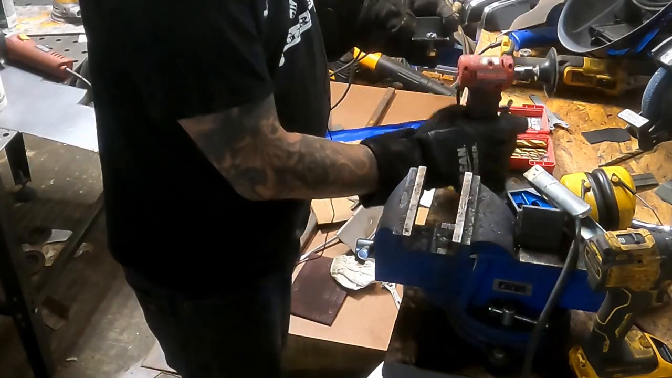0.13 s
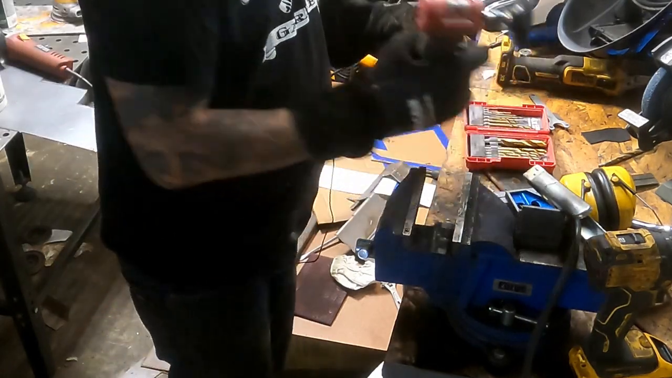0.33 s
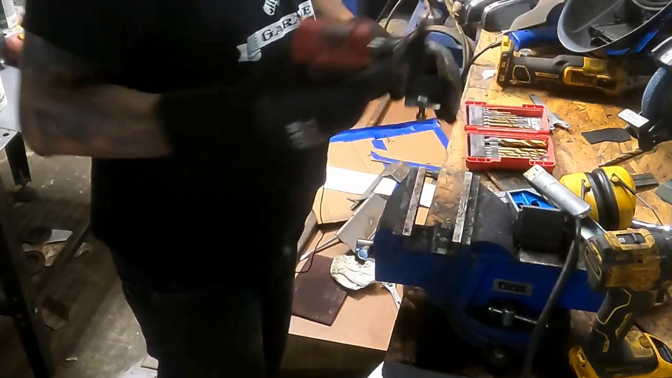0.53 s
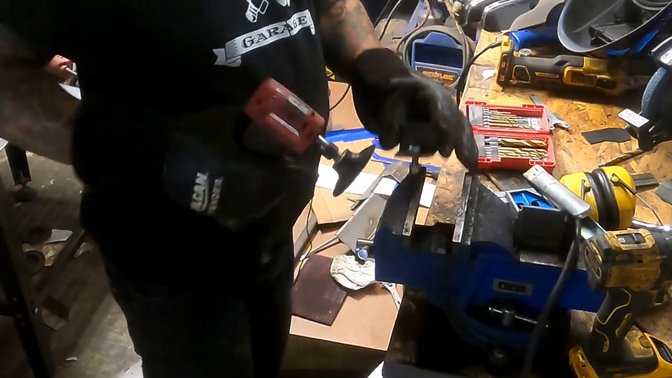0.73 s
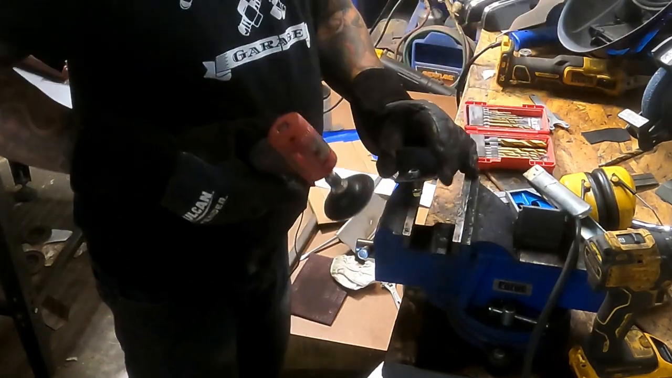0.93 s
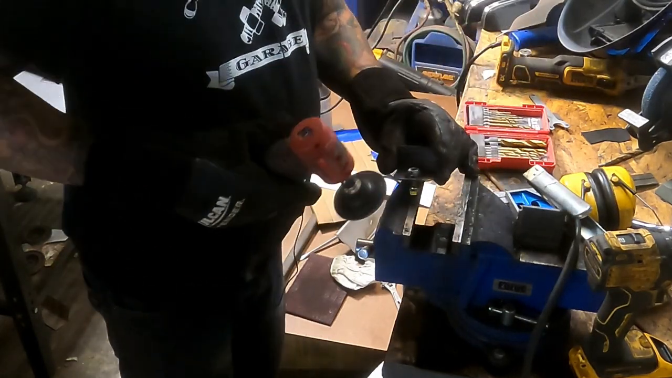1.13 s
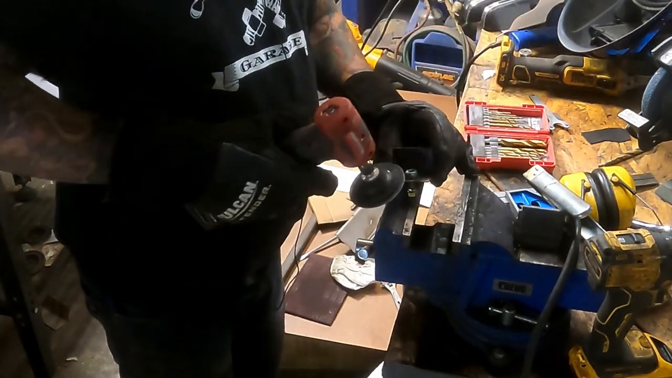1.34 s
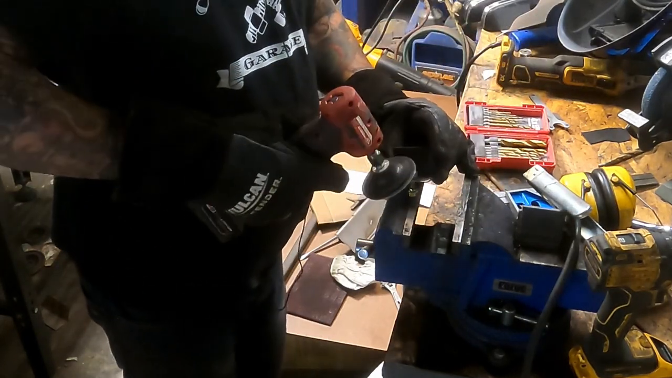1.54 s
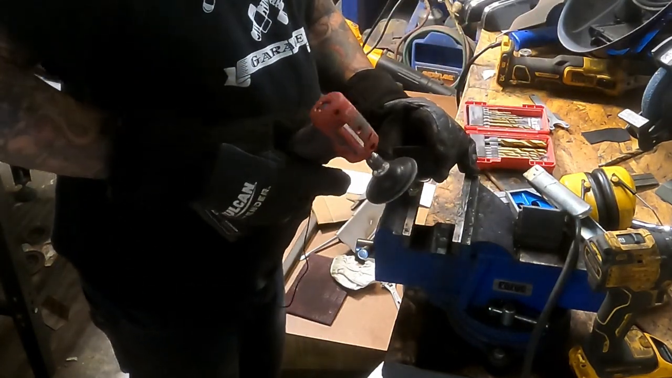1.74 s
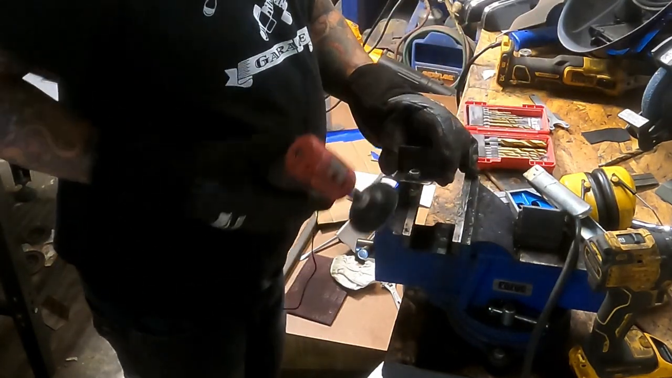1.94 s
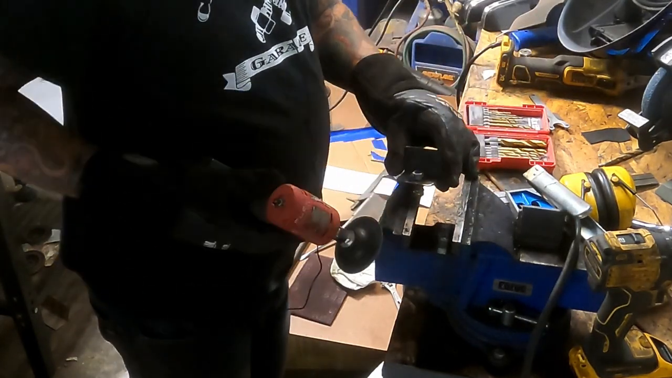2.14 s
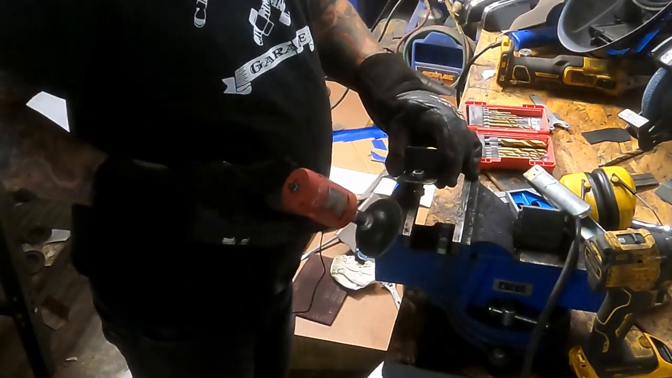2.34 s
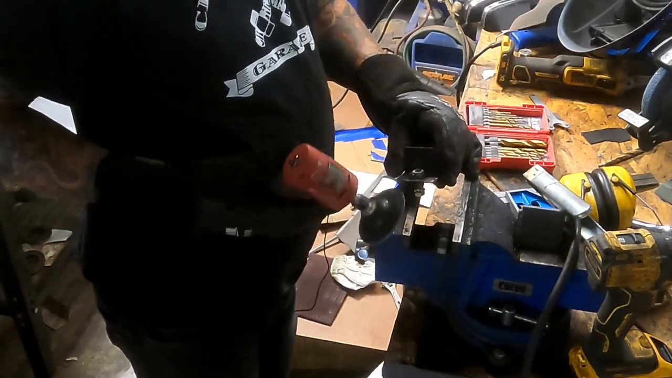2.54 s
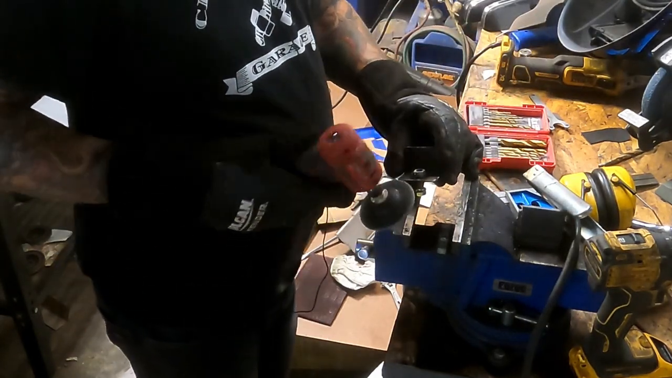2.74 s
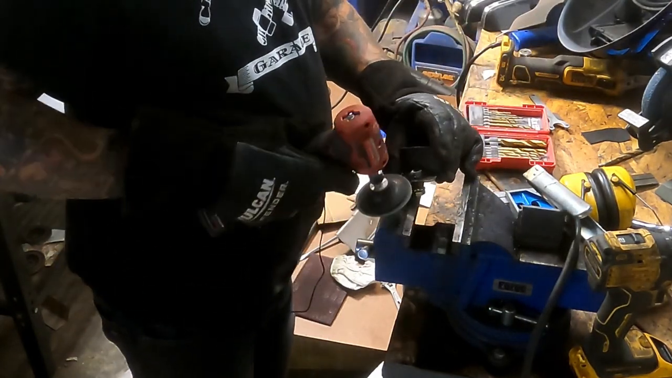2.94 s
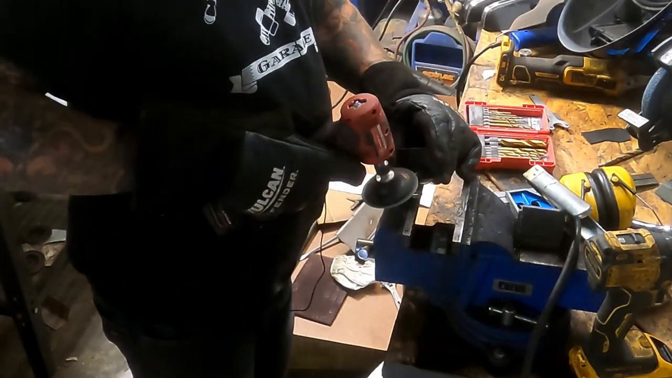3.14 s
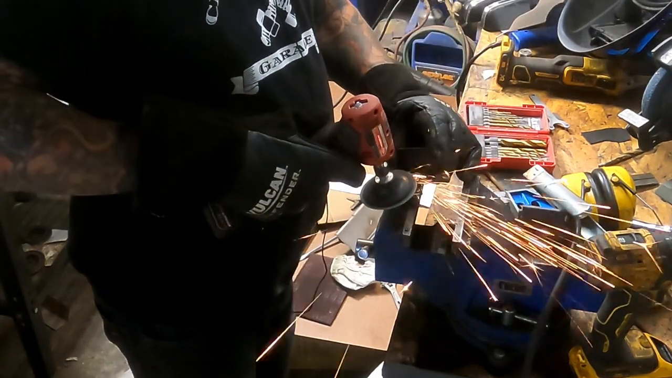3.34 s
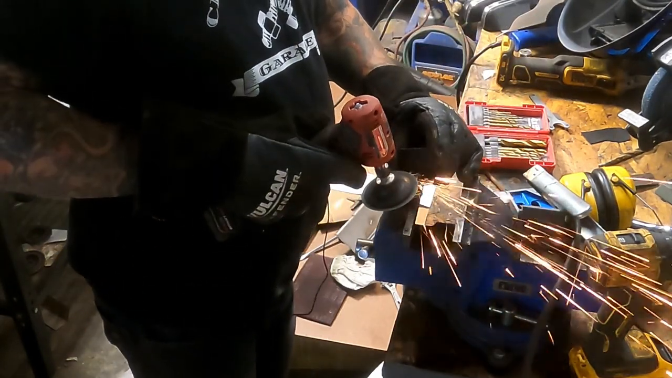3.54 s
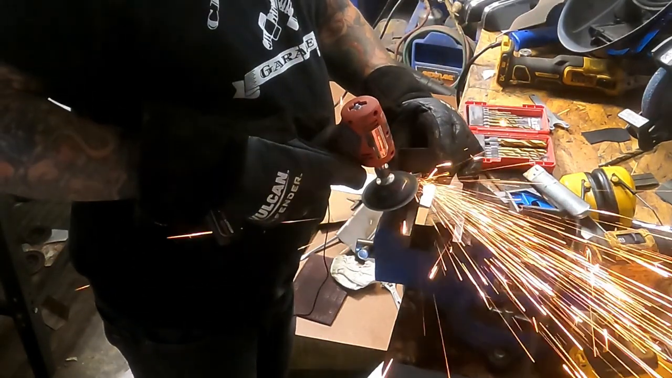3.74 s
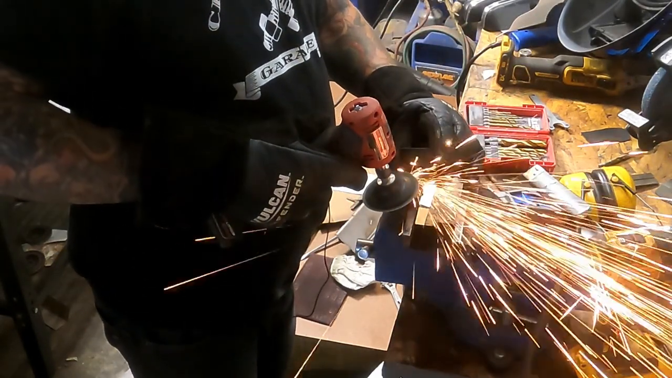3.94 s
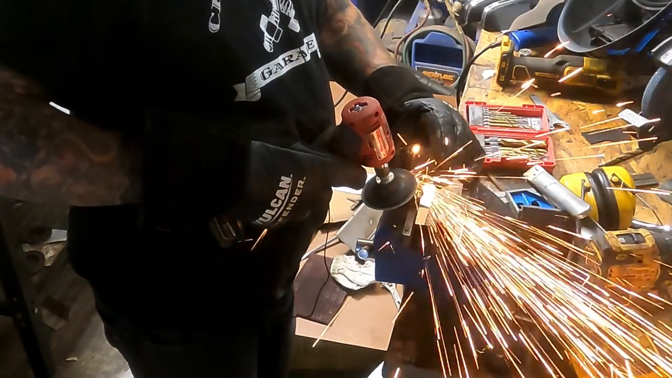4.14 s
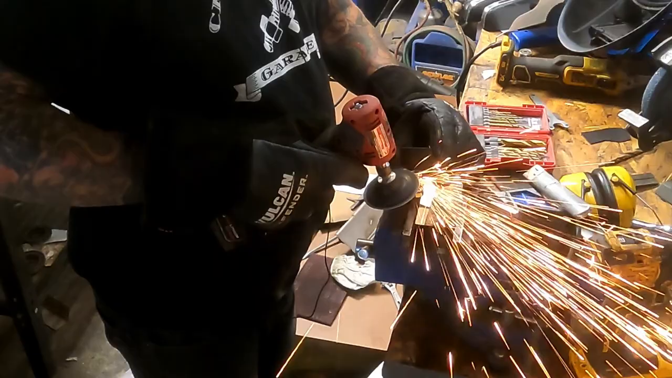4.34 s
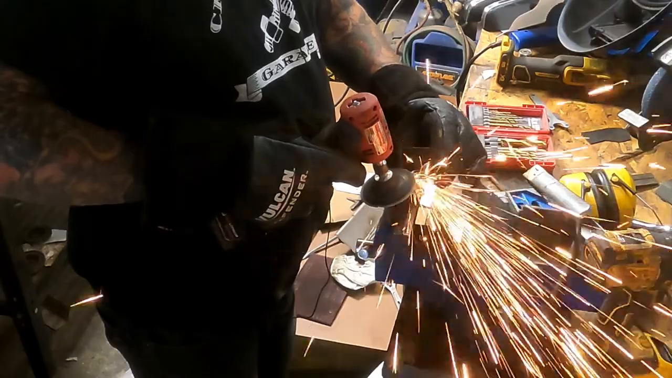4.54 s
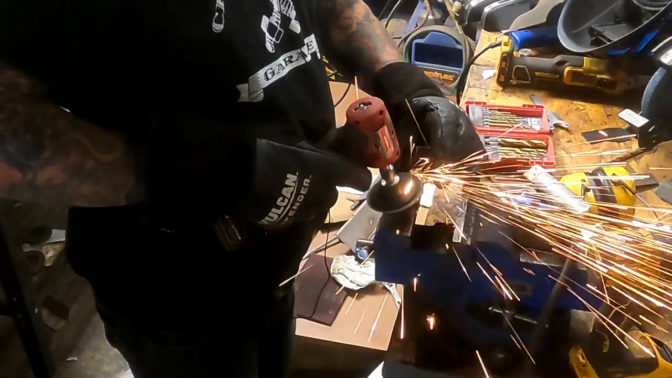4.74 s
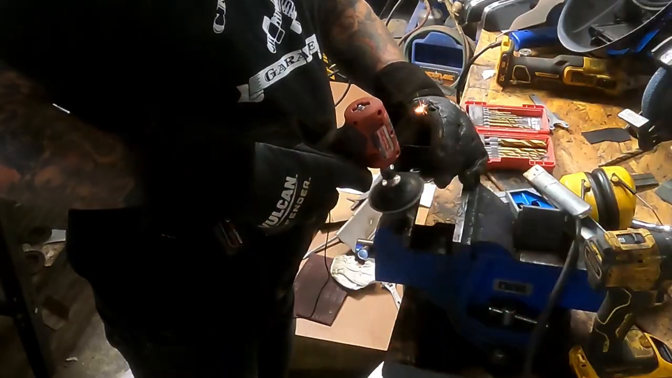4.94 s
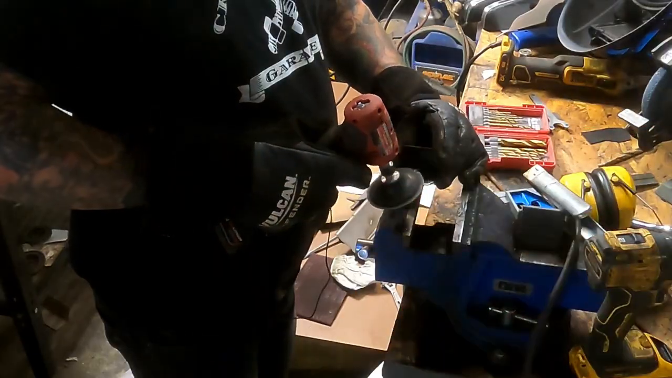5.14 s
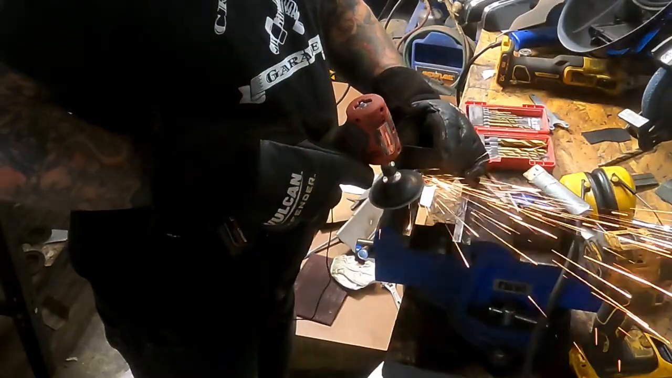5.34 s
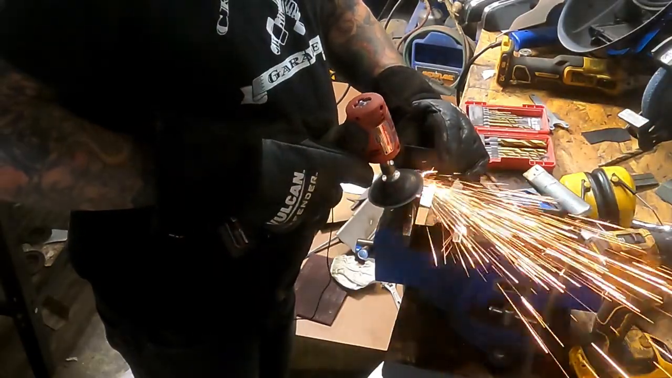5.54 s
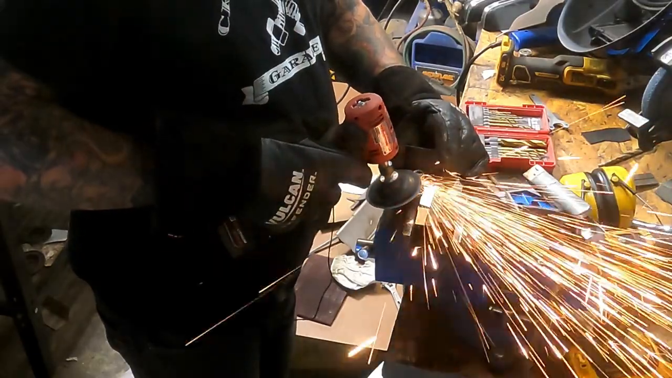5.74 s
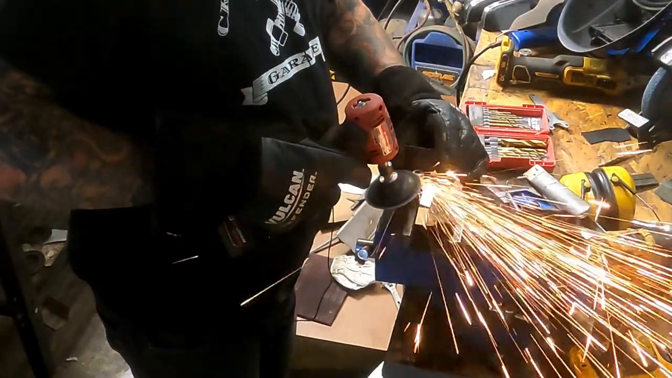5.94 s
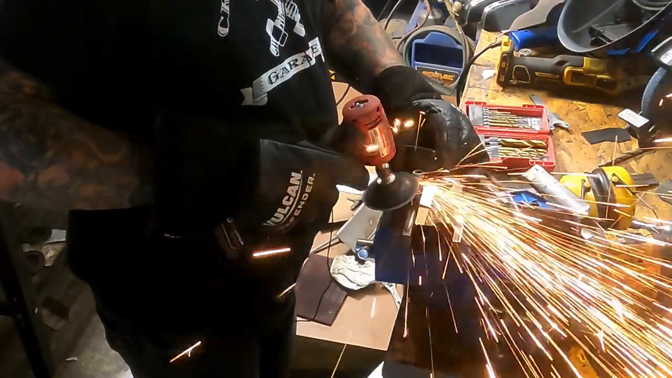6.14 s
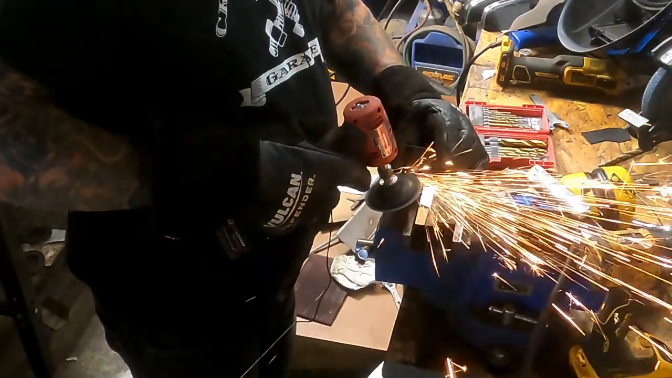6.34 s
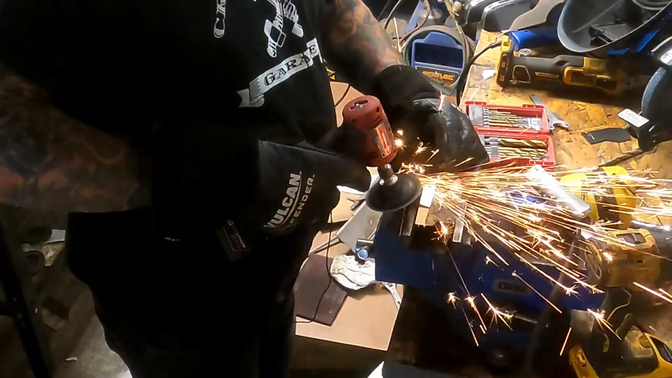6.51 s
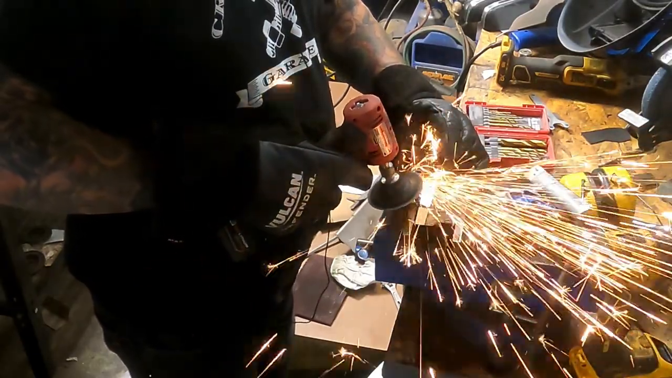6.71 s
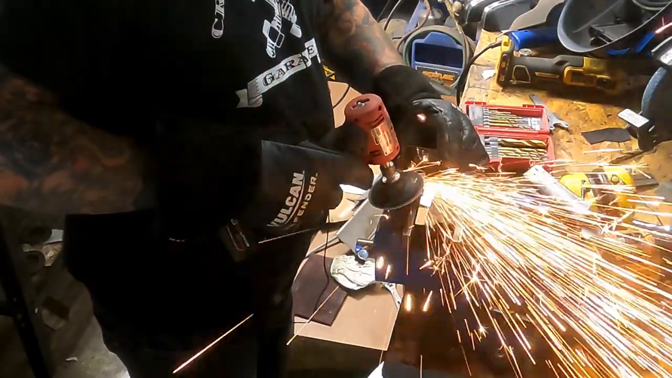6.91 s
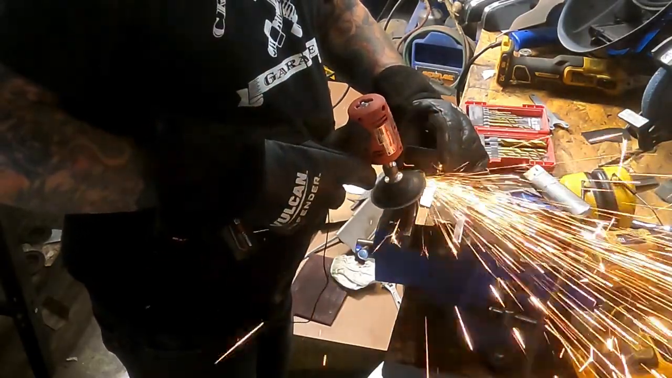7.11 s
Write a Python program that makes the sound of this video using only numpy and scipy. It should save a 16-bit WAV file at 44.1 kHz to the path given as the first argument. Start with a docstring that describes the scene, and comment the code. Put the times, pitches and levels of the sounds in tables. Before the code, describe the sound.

After light handling clicks, a small cordless grinder spins up and rasps against steel, pausing briefly between two bright passes.

```python
"""At a workbench in a quiet shop, a cordless die grinder is handled, switched on and pressed on steel
held in a vice. The disc's grit passes the steel once a turn, a nearly periodic force that excites its
resonances. The motor's switching tone, modulated by the turning field, splits into sidebands as the
shaft speeds up; fan, gears and bearings sound with it. Gloves rustle, small clicks mark the handling,
air gusts rumble on the microphone and the shop hums behind."""
import sys
import numpy as np
from scipy import signal
from scipy.fft import rfft, irfft
from scipy.io import wavfile
from scipy.ndimage import uniform_filter1d, map_coordinates

SR = 44100
rng = np.random.default_rng(int(sys.argv[2]) if len(sys.argv) > 2 else 0)


def generate_wav(signal):
    """Clip the signal to [-1, 1] and save it as 16-bit WAV at the path in sys.argv[1]."""
    frames = np.transpose(np.atleast_2d(signal))
    scaled = np.clip(frames, -1, 1) * 32767
    pcm = np.round(scaled).astype(np.int16)
    wavfile.write(sys.argv[1], SR, pcm)


N = 320607
TIME = np.arange(N) / SR
SWITCH_ON_S, FREE_SPEED_HZ = 2.715, 166.5

# low ring, hiss and top bands: (low edge [Hz], high edge [Hz])
BANDS = [(1400, 4100), (3900, 10000), (9700, 16000)]
# loudness of the grinding's low ring, hiss and top bands: (gain [dB])
BAND_GAINS = [1.0, -.6, -1.0]
# thin high ring of the disc: (time [s], level re hiss [dB])
DISC_SIZZLE = [(3.2, -13), (3.6, -13), (4.1, -18), (4.5, -32), (4.9, -22), (5.3, -34)]
def grinding(turns, shaft_hz):
    """Source-filter model: grit drives the steel, and the hand's contact sets the level of each band."""
    hiss_db, ring_db, top_db, repeat = contact(shaft_hz)
    steel = steel_response(grit_force(turns, repeat) * bounce(turns, repeat, hiss_db))
    ring, hiss, top = (undb(db) * even_out(band(band(steel, lo, hi), lo, hi))
                       for (lo, hi), db in zip(BANDS, BAND_GAINS))
    sizzle = even_out(band(steel, 14350, 14850)) * undb(curves(DISC_SIZZLE)[0])
    bright = undb(hiss_db) * (hiss + sizzle) + undb(ring_db) * ring + undb(top_db) * top
    return bright + growl(turns, shaft_hz, steel, hiss_db)


def grit_force(turns, repeat, wear_turns=7.44, rim_points=256):
    """Quasi-periodic excitation: the wearing rim returns each turn, while loose grit adds hiss."""
    loose = level(signal.lfilter(*signal.butter(1, 3300, "high", fs=SR), noise()), -3.5)
    roughness = rng.standard_normal((1000, rim_points))  # one row a turn
    for _ in range(2):
        roughness = signal.lfilter([1], [1, -np.exp(-1 / wear_turns)], roughness, axis=0)
    rim = level(map_coordinates(roughness[200:].ravel(), [turns * rim_points], order=3))
    return np.sqrt(repeat) * rim + np.sqrt(1 - repeat) * loose


def bounce(turns, repeat, hiss_db, skip_below_db=-23):
    """Amplitude modulation: the disc bounces on a high spot and a weaker opposite one, both drifting."""
    spots = np.cos(2 * np.pi * turns + 2.13 * walk(5))
    spots += .67 * np.cos(4 * np.pi * turns + 1.87 * walk(5))
    skipping = .1 * np.maximum(skip_below_db - hiss_db, 0) * (hiss_db > -60)  # under light contact
    depth = np.clip(.2 + .45 * (1 - repeat) + skipping, 0, 3)
    gain = np.exp(depth * spots)
    return gain / np.sqrt(uniform_filter1d(gain ** 2, 800))


# broad response of the steel: (frequency [Hz], gain [dB])
STEEL_SPECTRUM = [(530, -63.5), (900, -15), (1290, -9.5), (1410, -25.5), (1620, -13), (1880, -13),
                  (2220, -11), (4050, -11.5), (4860, -2.5), (5550, -1), (7060, 5.5), (12000, -2),
                  (16000, -19.5)]
# its resonances: (frequency [Hz], width [Hz], added peak re broad response [dB])
STEEL_MODES = [(2262, 260, 0), (2593, 360, -4), (5020, 250, -4), (6920, 430, -6), (9250, 240, -6),
               (15660, 280, -13)]
def steel_response(force, shift_db=3.2):
    """Forced resonance: the steel rings, and its third-octave levels shift as the contact point moves."""
    ringing = colour(force, STEEL_SPECTRUM, STEEL_MODES)
    centres_hz = 1000 * 2 ** np.arange(0, 4.1, 1 / 3)
    thirds = (band(ringing, hz * 2 ** (-1 / 6), hz * 2 ** (1 / 6)) for hz in centres_hz)
    return sum((-1) ** k * third * undb(shift_db * walk(14)) for k, third in enumerate(thirds))


# low tones under load: (multiple of shaft speed, relative level [dB])
GROWL_ORDERS = [(2, -9), (3, 0), (4, -8), (5, -3), (6, -8), (7, -11), (8, -4)]
def growl(turns, shaft_hz, steel, hiss_db):
    """Rotational harmonics: the loaded tool growls, less as a lighter load lets the shaft run faster."""
    firmness_db = hiss_db + 27  # below zero the disc barely touches and the growl dies with the hiss
    growl_db = -49 + .2 * firmness_db + np.minimum(firmness_db, 0)
    growl_db -= .4 * np.maximum(shaft_hz - 165, 0)
    return undb(growl_db) * (orders(turns, GROWL_ORDERS, 4) + level(band(steel, 770, 1400), -5))


# disc meets steel: (time [s], entry re bite [dB], bite level [dB], rise [s], time to fade 10 dB [s],
# low ring re bite [dB], lift time [s])
DISC_TOUCHES = [(3.195, -6, -11, .018, .045, -11, 3.29), (3.341, -14, -15, .03, .06, -7, 3.44),
                (3.476, -15, -14, .024, .05, -13, 4.803), (4.82, -6, -17.5, .016, .13, -5, 4.93),
                (5.258, -7, -14, .03, .045, -6.5, 7.4)]
# two long passes, each: (time [s], hiss level [dB], low ring re hiss [dB], top re hiss [dB])
LONG_PASSES = [
    [(3.53, -17, -10, -9), (3.6, -18, -13, -10), (3.628, -17, -8, -10), (3.876, -18, -10, -9),
     (4.014, -18, -6, -8), (4.158, -16, -13, -11), (4.23, -19, -8, -9), (4.266, -17, -13, -8),
     (4.318, -17, -9, -13), (4.476, -16, -10, -13), (4.582, -21, -4, -5), (4.624, -17, -6, -10),
     (4.68, -17, -10, -9), (4.74, -20, -5, -10), (4.79, -18, -2, -5)],
    [(5.33, -19, -4, -5), (5.35, -19, -10, -9), (5.518, -16, -8, -7), (5.562, -17, -10, -11),
     (5.674, -18, -7, -7), (5.702, -16, -9, -9), (5.826, -20, -7, -7), (5.928, -16, -10, -10),
     (6.004, -20, -9, -7), (6.162, -19, -4, -3), (6.518, -18, -9, -8), (6.762, -19, -5, -5),
     (7.058, -17, -10, -10), (7.236, -17, -8, -7), (7.27, -21, -2, -3)],
]
def contact(shaft_hz, lift_db_per_s=750):
    """Friction envelopes: each touch bites, then fades or settles into a pass, and dies when lifted."""
    hiss_db, ring_re_hiss, top_re_hiss = curves(np.concatenate(LONG_PASSES))
    held_db = np.array([hiss_db, hiss_db + ring_re_hiss, hiss_db + top_re_hiss])
    starts = [int(touch[0] * SR) for touch in DISC_TOUCHES]
    held_db[:, :starts[2]] = held_db[:, starts[3]:starts[4]] = -99  # the short touches only bite
    bands_db, contact_age = np.full((3, N), -99.), np.zeros(N)
    for start, entry_db, bite_db, rise, fade, ring_db, lift in DISC_TOUCHES:
        span = slice(int(start * SR), min(int((lift + .15) * SR), N))
        age = np.arange(span.stop - span.start) / SR
        fall_db = 10 * (np.maximum(age - rise, 0) / fade) ** 1.5
        bite = bite_db + np.array([-fall_db, ring_db - .8 * fall_db, -12 - .8 * fall_db])
        attack_db = entry_db * np.maximum(1 - age / rise, 0)
        release_db = lift_db_per_s * np.maximum(age + start - lift, 0)
        bands_db[:, span] = np.maximum(bite, held_db[:, span]) + attack_db - release_db
        contact_age[span] = age
    return *bands_db, repeating_share(shaft_hz, contact_age)


def repeating_share(shaft_hz, contact_age, fresh=.45, bedded=.97, bed_in_s=.09):
    """Turn-to-turn coherence: it grows as the disc beds in and drops most as it digs in and slows."""
    hz_per_s = uniform_filter1d(np.gradient(shaft_hz) * SR * (contact_age > 0), int(.06 * SR))
    slip = .001 * np.abs(hz_per_s) + .003 * np.maximum(-hz_per_s, 0)
    return np.clip(bedded - (bedded - fresh) * np.exp(-contact_age / bed_in_s) - slip, .1, 1)


# shaft under load: (time [s], rotation rate [Hz])
LOADED_SPEED = [(3.22, 154.1), (3.3, 156.7), (3.34, 164.2), (3.39, 157.8), (3.44, 158.7), (3.48, 166.8),
                (3.52, 161.6), (3.77, 163.0), (3.81, 165.4), (4.13, 163.9), (4.19, 159.5), (4.3, 167.6),
                (4.36, 163.3), (4.47, 167.7), (4.54, 150.3), (4.78, 181.1), (4.92, 170.8), (4.99, 173.9),
                (5.02, 180.4), (5.25, 173.9), (5.33, 159.6), (5.44, 164.3), (5.52, 156.9), (5.63, 155.7),
                (5.69, 161.5), (5.78, 161.0), (5.88, 168.1), (5.95, 164.2), (6.05, 168.6), (6.14, 156.3),
                (6.29, 172.3), (6.47, 165.4), (6.63, 170.9), (6.77, 164.8), (6.83, 167.1), (6.95, 160.1),
                (7.07, 170.0), (7.19, 164.8), (7.22, 158.0), (7.27, 157.9)]
def shaft_speed(run_up_s=.115, soft_start_s=.045):
    """Second-order step response: the shaft nears free speed through two lags, then the load shakes it."""
    age = np.maximum(TIME - SWITCH_ON_S, 0)
    lag = run_up_s * np.exp(-age / run_up_s) - soft_start_s * np.exp(-age / soft_start_s)
    free_hz = FREE_SPEED_HZ * (1 - lag / (run_up_s - soft_start_s))
    loaded_hz = curves(LOADED_SPEED)[0] * (1 + .0015 * walk(20))
    return np.where(TIME < DISC_TOUCHES[0][0], free_hz, loaded_hz)


# running tool: (time [s], gear noise [dB], lower sideband [dB], upper sideband [dB])
MOTOR_LEVELS = [(2.682, -75, -44, -42), (2.79, -58, -39, -33.5), (2.9, -53, -40, -40.5),
                (3.15, -35.5, -32, -40), (3.33, -34, -42, -48), (4.9, -33.5, -44, -50),
                (5.02, -42, -42, -44), (5.25, -39, -35, -44)]
def motor(turns, shaft_hz):
    """Superposition: switching tone, fan, gears and bearings add up to the sound of the drive."""
    silence = (MOTOR_LEVELS[0][0] - .003, -99, -99, -99)
    gear_db, lower_db, upper_db = curves([silence, *MOTOR_LEVELS])
    return (switching_tone(turns, lower_db, upper_db) + fan() + gear_whirr(gear_db)
            + bearings(turns, shaft_hz) + full_speed_tones(turns, shaft_hz))


def switching_tone(turns, lower_db, upper_db, switch_hz=7762, pole_pairs=4):
    """Sidebands: the turning field splits the switching tone into lines that part with speed."""
    carrier, field = switch_hz * TIME, pole_pairs * turns
    whine = tone(carrier - field, lower_db + walk(30)) + tone(carrier + field, upper_db + walk(30))
    whine += tone(carrier, lower_db - 17) + tone(carrier - 2 * field, lower_db - 8)
    octave_db = lower_db - 18 - 70 * np.maximum(TIME - MOTOR_LEVELS[0][0], 0)
    return whine + tone(2 * carrier - field, octave_db) + tone(2 * carrier + field, octave_db)


# fan hiss: (frequency [Hz], gain [dB])
FAN_SPECTRUM = [(880, -54), (1500, -22), (2270, -26), (3780, -4.5), (4210, -13.5), (6430, -8), (7140, -7),
                (8410, -14), (11000, -31), (15000, -42)]
def fan(rise_s=.05, hold_s=.15, fall_db_per_s=55):
    """Broadband flow noise: the fan hisses loudest while the shaft gathers speed."""
    age = TIME - SWITCH_ON_S - .03
    fan_db = np.maximum(-35 - fall_db_per_s * np.maximum(age - rise_s - hold_s, 0), -55)
    onset = np.clip(age / rise_s, 1e-3, 1)
    return level(colour(noise(), FAN_SPECTRUM, [(3790, 75, 3)]), fan_db) * onset


# gear noise: (frequency [Hz], gain [dB])
GEAR_SPECTRUM = [(180, -57), (300, -10.5), (453, -14.5), (1640, -11.5), (2100, -3), (3400, -7.5),
                 (5850, -6.5), (7140, -2.5), (7500, -30), (8700, -13), (15500, -27)]
def gear_whirr(gear_db):
    """Spectrally shaped noise: the continuous part of the gears' sound."""
    return level(colour(noise(), GEAR_SPECTRUM), gear_db)


# gear and bearing tones near full speed: (multiple of shaft speed, relative level [dB])
FULL_SPEED_ORDERS = [(4, -16), (7.7, -6.5), (12, -0.5), (13, 0), (13.75, -2.5), (14.3, -4), (15.3, -0.5),
                     (17.85, -4), (25.5, -6)]
def full_speed_tones(turns, shaft_hz, full_hz=168):
    """Periodic rotation: gear and bearing tones locked to the shaft come in near full speed."""
    return orders(turns, FULL_SPEED_ORDERS, 1.9) * undb(-39 + 1.8 * np.minimum(shaft_hz - full_hz, 0))


# bearing tones: (multiple of shaft speed, relative level [dB])
BEARING_ORDERS = [(4, -5), (8, -5), (12, 1), (13, -3), (27.9, 2), (31.5, -2), (39.5, 1), (55, -5)]
def bearings(turns, shaft_hz, fade_db_per_s=55):
    """Power-law growth: bearing tones swell with speed through the casing and fade once the disc works."""
    casing = [(500, -8), (2500, -8), (3700, 0), (7000, -3)]  # (frequency [Hz], gain [dB])
    speed_gain = (shaft_hz / FREE_SPEED_HZ + 1e-3) ** 2.5
    fade_db = fade_db_per_s * np.maximum(TIME - DISC_TOUCHES[0][0], 0)
    return level(colour(orders(turns, BEARING_ORDERS, 3), casing), -42.5 - fade_db) * speed_gain


def unbalance(turns, shaft_hz, loudness, full_hz=146):
    """Rotating unbalance: a wavering tone at shaft speed, stronger when the disc runs free."""
    db = -55 + 1.2 * np.minimum(shaft_hz - full_hz, 0) + 4.5 * (1 - loudness)
    return tone(turns, db + 3 * walk(10))


# clicks: (time [s], peak [dB], low edge [Hz], high edge [Hz], T60 [s], metal ring re peak [dB])
HANDLING_CLICKS = [(0.075, -25, 1470, 10200, 0.059, -45), (0.228, -21.5, 120, 910, 0.017, -60),
                   (.39, -48, 5500, 9000, 0.15, -60), (.43, -44, 7000, 12900, 0.014, -60),
                   (0.463, -40.5, 4500, 8000, .03, -50), (.617, -42, 4530, 7000, 0.013, -60),
                   (.627, -40, 4840, 9000, 0.018, -60), (.645, -30.5, 4900, 13000, .015, -60),
                   (.679, -28.5, 500, 3580, 0.017, -60), (.695, -33.5, 600, 3500, 0.017, -60),
                   (.707, -29, 490, 2440, .025, -60), (.83, -41.5, 80, 500, 0.37, -60),
                   (.846, -17.5, 3540, 9500, 0.013, -25), (.852, -26.5, 400, 9000, 0.12, -60),
                   (1.137, -32.5, 1170, 10000, 0.11, -14), (2.04, -45, 1990, 6500, .03, -60),
                   (2.443, -23.5, 1400, 3000, 0.029, -59), (2.444, -22.5, 3000, 14000, 0.019, -62.5),
                   (2.453, -35, 1500, 12000, .04, -60), (2.747, -35, 790, 1290, 0.012, -58)]
# ringing metal: (frequency [Hz], relative level [dB], T60 [s])
METAL_MODES = [(5400, -14, .08), (6020, -10, .12), (6966, -4, .17), (8048, 0, .17)]
def clicks():
    """Impact and free decay: short noise bursts, some with the ring of damped metal modes."""
    t = np.arange(8192) / SR
    out = np.zeros(N + len(t))
    ring = sum(undb(db) * np.sin(2 * np.pi * hz * t) * decay(t, t60) for hz, db, t60 in METAL_MODES)
    for start, peak_db, lo_hz, hi_hz, t60, ring_db in HANDLING_CLICKS:
        burst = noise(len(t)) * decay(t, t60)
        crack = band(band(burst, lo_hz, hi_hz), lo_hz, hi_hz)
        click = crack / np.abs(crack).max() + undb(ring_db) * ring
        out[int(start * SR):][:len(t)] += undb(peak_db) * click
    return out[:N]


# gloves and cloth: (time [s], rustle level [dB], low rubbing level [dB])
GLOVE_LEVELS = [(0.0, -63, -54.5), (0.36, -67, -61), (0.53, -56.5, -60), (0.78, -54.5, -54),
                (0.89, -50, -49.5), (0.98, -63.5, -56.5), (1.67, -78, -67), (2.29, -75, -68),
                (2.51, -60.5, -64.5), (2.73, -50, -56), (2.75, -52, -58)]
def gloves():
    """Friction noise: cloth gives a grainy rustle over a lower rubbing."""
    grains = noise() * undb(2.8 * rng.exponential(1, N))
    rustle_db, rub_db = curves([*GLOVE_LEVELS, (3, -80, -80)])
    rustle = level(band(grains, 650, 6200), rustle_db + 1.5 * walk(25.06))
    return rustle + level(band(grains, 130, 850), rub_db + 2.5 * walk(28))


# air on the microphone: (start [s], duration [s], level [dB])
AIR_GUSTS = [(0, 1.05, -52), (1.2, .45, -52), (1.7, .6, -47), (2.3, .9, -58), (2.68, .15, -47),
             (3.2, .55, -42), (3.75, .6, -55), (5.0, .5, -56), (5.5, .38, -44), (5.9, .5, -58)]
def gusts(calm_db=-64., rise_s=.08, flutter_db=3.5):
    """Pressure fluctuation: air on the microphone makes a low rumble that swells and flutters."""
    db = np.full(N, calm_db)
    for start, length, top_db in AIR_GUSTS:
        swell = np.clip(np.minimum(TIME - start, start + length - TIME) / rise_s, 0, 1)
        db = np.maximum(db, calm_db + (top_db - calm_db) * swell)
    return level(band(noise(), 7.6, 44), db + flutter_db * walk(9))


# background noise: (frequency [Hz], gain [dB])
SHOP_SPECTRUM = [(29, -19), (50, -13.5), (167, -8), (234, -3.5), (284, -16.5), (337, -8.5), (905, -11),
                 (1120, -12), (4900, -24.5), (14900, -34), (16000, -42)]
# hum of two machines: (frequency [Hz], level [dB])
MACHINE_HUM = [(118.6, -61.5), (120.6, -79.5), (238, -74.5)]
def shop():
    """Beating: two machines hum at nearly the same pitch over a broadband noise floor."""
    floor = level(colour(noise(), SHOP_SPECTRUM), -54.5 + 1.6 * walk(4.77))
    return floor + sum(tone(hz * TIME, db) for hz, db in MACHINE_HUM)


def undb(db):
    """Amplitude ratio of a level in decibels."""
    return 10 ** (np.asarray(db) / 20)


def level(x, db=0):
    """Normalisation to unit rms, then a gain in decibels."""
    return x * undb(db) / np.sqrt(np.mean(x ** 2))


def even_out(x, window_s=.13):
    """Normalisation by the running rms."""
    return x / np.sqrt(uniform_filter1d(x ** 2, int(window_s * SR)) + 1e-9)


def noise(samples=N):
    """Gaussian white noise."""
    return rng.standard_normal(samples)


def tone(cycles, db):
    """Sinusoid of a given rms level."""
    return np.sqrt(2) * undb(db) * np.sin(2 * np.pi * cycles)


def orders(turns, table, flicker_db):
    """Rotational orders: tones on multiples of the shaft speed, each wavering alone."""
    return level(sum(undb(db + flicker_db * walk(9)) * np.sin(2 * np.pi * (k * turns + rng.random()))
                     for k, db in table))


def decay(t, t60):
    """Exponential decay of 60 dB in t60 seconds."""
    return np.exp(-np.log(1000) * t / t60)


def curves(table):
    """Linear interpolation of each column over time."""
    times, *columns = np.transpose(table)
    return [np.interp(TIME, times, column) for column in columns]


def walk(rate_hz):
    """Slow random modulation: held values, smoothed twice."""
    hold = int(SR / rate_hz)
    steps = np.repeat(noise(N // hold + 1), hold)
    return .94 * uniform_filter1d(uniform_filter1d(steps, hold), hold)[:N]


def band(x, lo_hz, hi_hz):
    """Band-pass filter."""
    return signal.sosfilt(signal.butter(2, [lo_hz, hi_hz], "band", fs=SR, output="sos"), x)


def colour(x, spectrum, modes=()):
    """Minimum-phase filter through (frequency [Hz], gain [dB]) points, raised by resonances."""
    hz = np.linspace(1, SR / 2, 1025)
    points_hz, points_db = np.transpose(spectrum)
    gain = undb(np.interp(np.log(hz), np.log(points_hz), points_db))
    for centre, width, db in modes:
        gain *= 1 + undb(db) / (1 + (2 * (hz - centre) / width) ** 2)
    cepstrum = irfft(np.log(gain))
    cepstrum[1:1024] *= 2  # folding onto positive time makes the filter causal
    cepstrum[1025:] = 0
    return signal.fftconvolve(x, irfft(np.exp(rfft(cepstrum))))[:N]


def convolve(x, response, db):
    """Convolution with a unit-energy impulse response, then a gain in decibels."""
    return signal.fftconvolve(x, undb(db) * response / np.sqrt(np.sum(response ** 2)))[:N]


def scene():
    """Reverberation: the walls add a short tail. Left and right differ very faintly."""
    shaft_hz = shaft_speed()
    turns = np.cumsum(shaft_hz) / SR
    grind = grinding(turns, shaft_hz)
    loudness = np.clip(20 * uniform_filter1d(np.abs(grind), int(.089 * SR)), 0, 1)
    dip = undb(-8 * loudness)  # motor and shop sink while the grinding is loud
    direct = grind + unbalance(turns, shaft_hz, loudness) + motor(turns, shaft_hz) * dip
    direct += clicks() + gloves()
    t = np.arange(SR // 2) / SR
    tail, spread = rng.standard_normal((2, len(t))) * decay(t, t60=.2)
    air = gusts()
    mid = direct + convolve(direct, tail, -13) + shop() * dip
    side = convolve(mid, spread ** 3, -40) + undb(-28) * np.roll(air, 900)
    return np.array([mid + air + side, mid + air - side])


def record(dry, top_hz=15800):
    """Saturation and band limiting: the microphone rounds the loudest peaks and cuts the top."""
    soft = np.tanh(1.1 * dry) / 1.1
    return signal.sosfilt(signal.ellip(10, .2, 70, top_hz, fs=SR, output="sos"), soft)


dry = scene()
out = record(dry)
generate_wav(out)
```